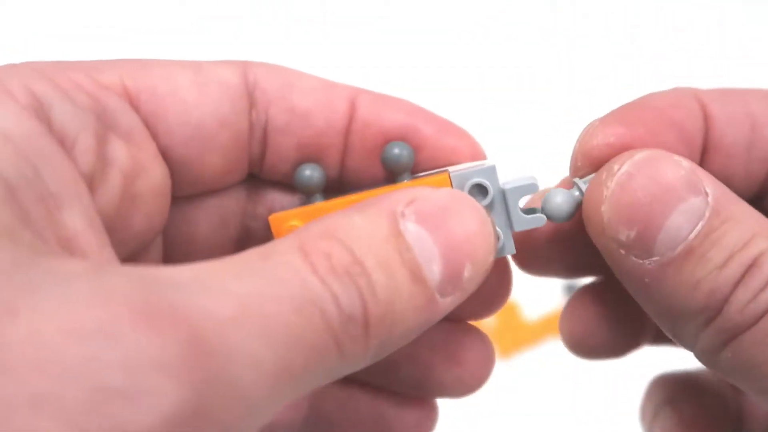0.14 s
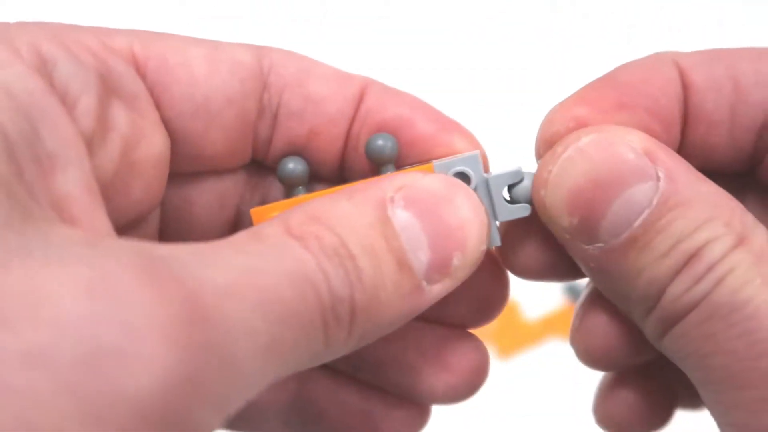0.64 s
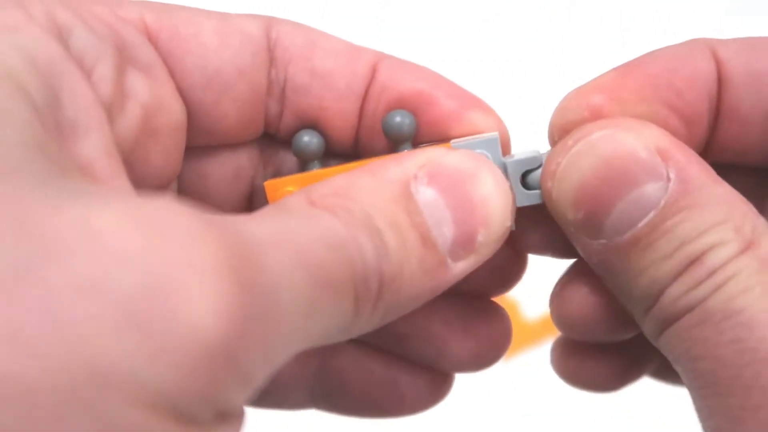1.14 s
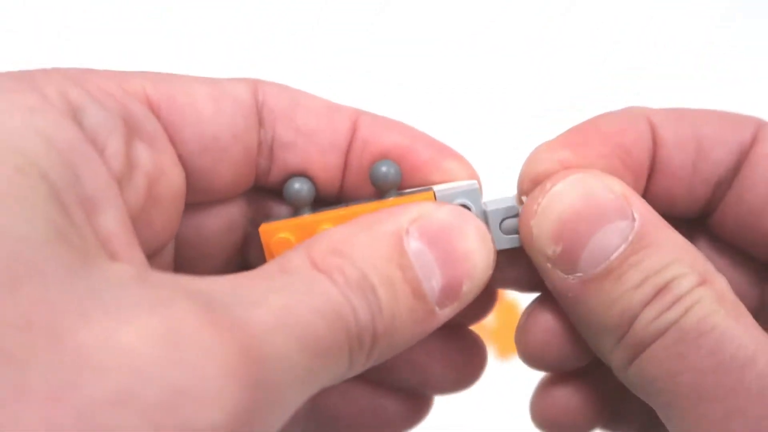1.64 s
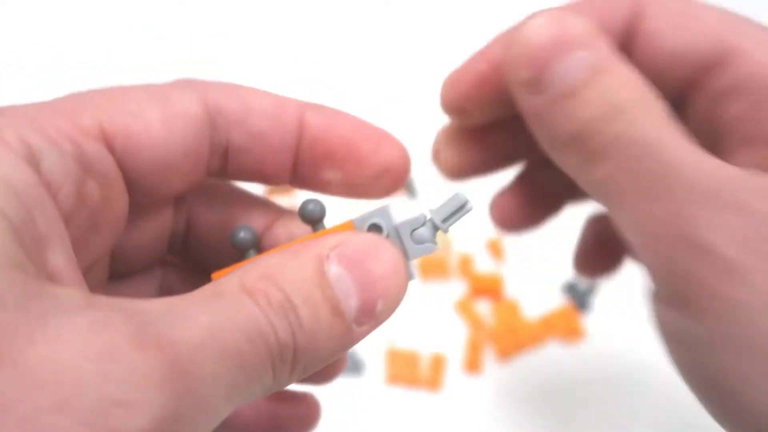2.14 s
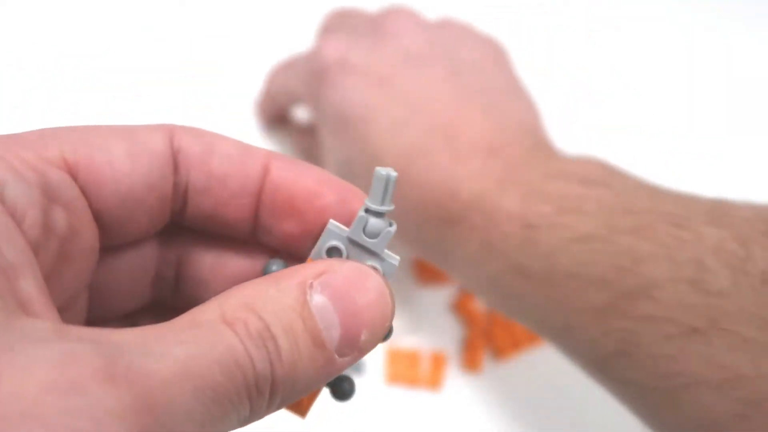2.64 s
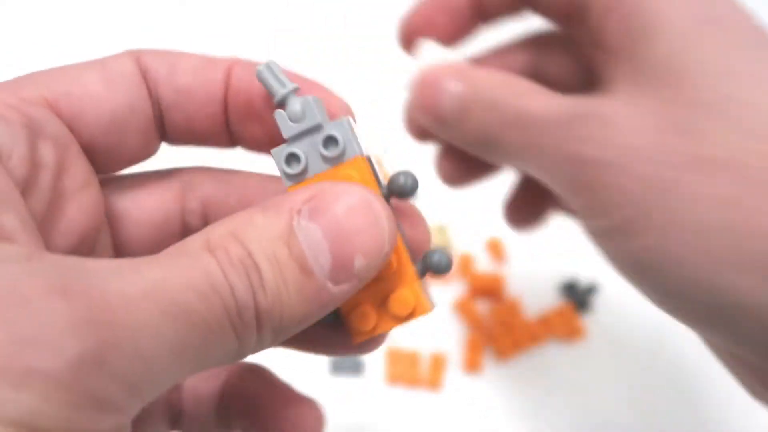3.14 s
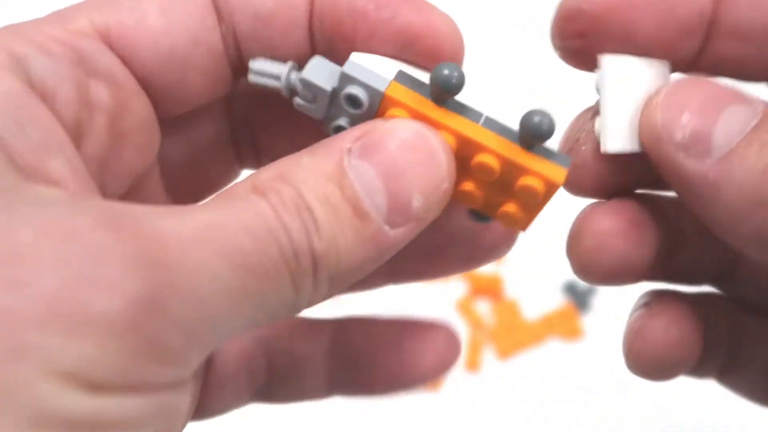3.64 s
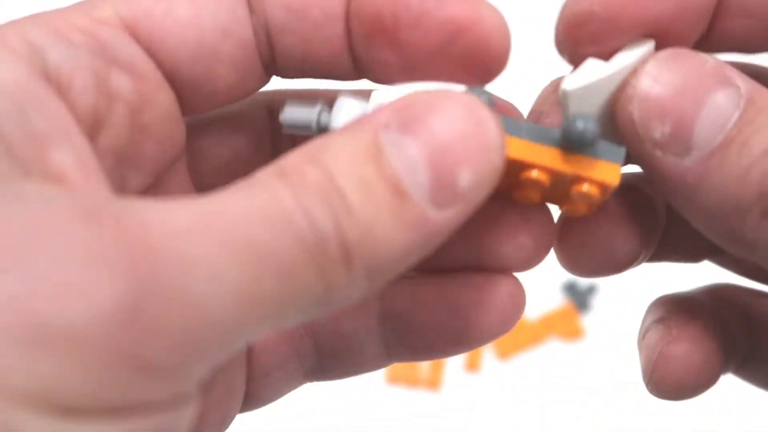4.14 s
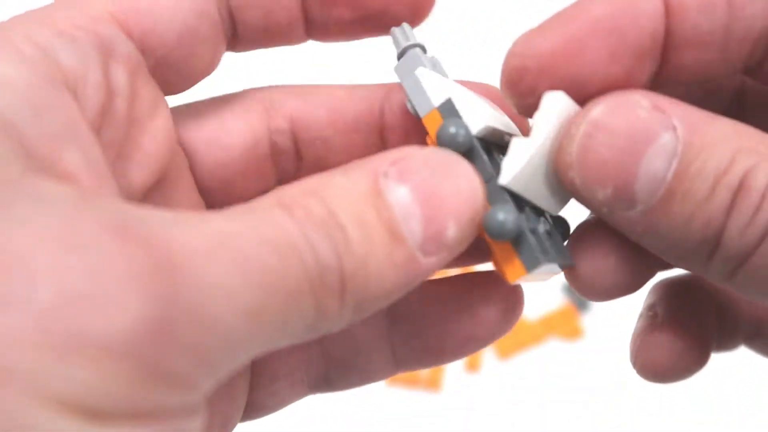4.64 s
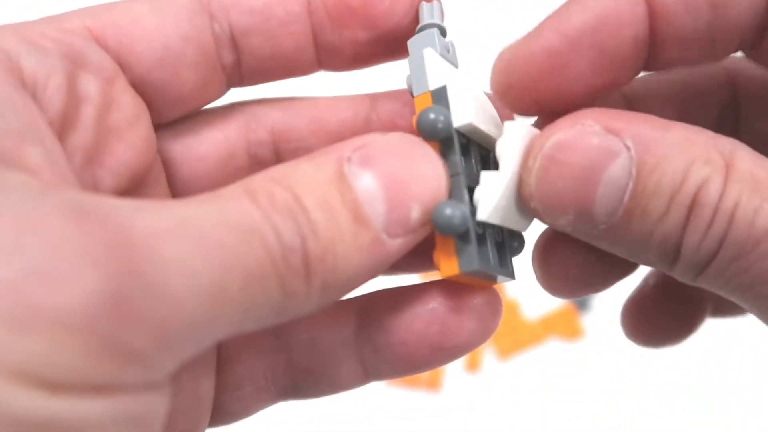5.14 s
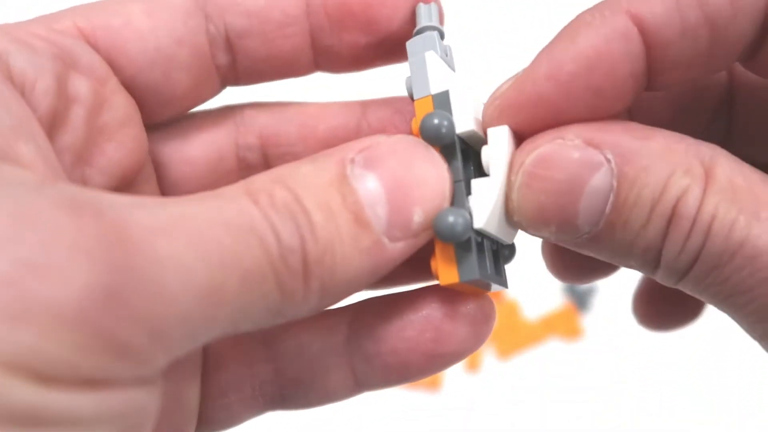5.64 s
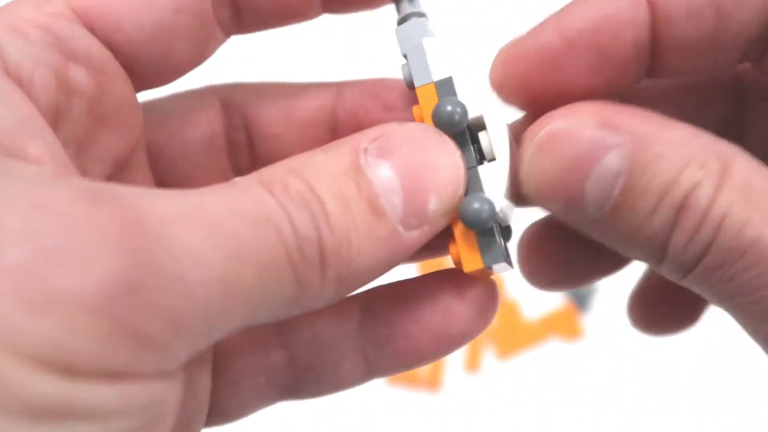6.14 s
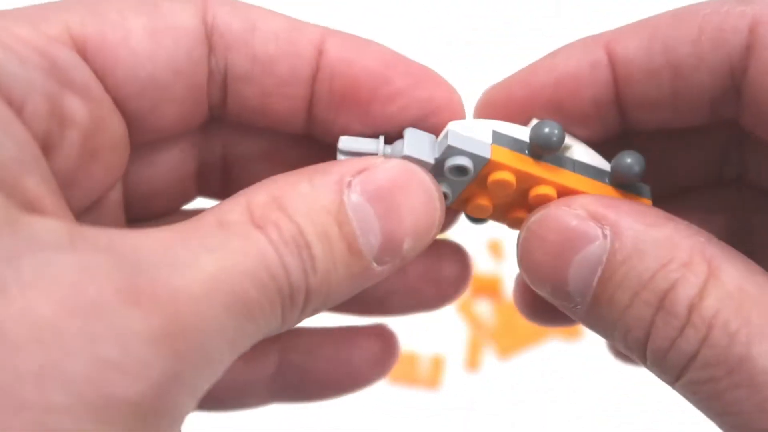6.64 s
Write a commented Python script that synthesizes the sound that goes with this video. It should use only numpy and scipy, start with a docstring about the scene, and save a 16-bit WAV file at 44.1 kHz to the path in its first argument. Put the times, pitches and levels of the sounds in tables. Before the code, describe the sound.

In a hushed small room, a tiny plastic joint snaps hard, a hand bumps the table, a loose brick clicks, and another piece seats lightly.

```python
"""Toy bricks joined by hand

Small plastic bricks above a table, close to a camera in a small quiet room. A ball joint snaps into its socket;
a hand knocks the table, nudges and lifts a loose brick, which later seats on its studs; light ticks between.
Contacts are impulses through resonances, plus a noise burst for the snap and decaying sines for the ticks.
Under it: microphone hiss, room rumble, the camera's faint whine and motor; gain ducks after the loud snap."""
import sys
import numpy as np
from scipy import signal
from scipy.fft import rfft, irfft, next_fast_len
from scipy.io import wavfile
from scipy.ndimage import uniform_filter1d, map_coordinates

SR = 44100
rng = np.random.default_rng(int(sys.argv[2]) if len(sys.argv) > 2 else 0)


def unload_wav(signal):
    """Save mono or channel-first audio to the path in sys.argv[1] as 16-bit WAV at rate SR, clipped to [-1, 1]."""
    wavfile.write(
        sys.argv[1],
        SR,
        np.round(np.clip(np.atleast_2d(signal).T, -1, 1) * 32767).astype(np.int16),
    )


def magnitude_from_level(level_db):
    """Linear magnitude for a level in decibels (20 dB per decade)."""
    exponent = np.asarray(level_db, float) / 20
    return 10 ** exponent


N = 297832


def unit(x):
    """Scaled to rms 1."""
    return x / np.sqrt(np.mean(x ** 2) + 1e-20)


def along(points, hz):
    """(frequency [Hz], value) points interpolated on a log-frequency axis."""
    point_hz, value = np.transpose(points)
    return np.interp(np.log(hz + 1), np.log(point_hz + 1), value)


def filtered(x, response):
    """x times a complex response of frequency."""
    m = next_fast_len(N + SR // 2)
    return irfft(rfft(x, m) * response(np.fft.rfftfreq(m, 1 / SR)), m)[..., :N]


def narrow(hz, width_hz, channels):
    """A Gaussian band of noise, rms 1."""
    noise = rng.standard_normal((channels, N))
    return unit(filtered(noise, lambda f: np.exp(-2 * ((f - hz) / width_hz) ** 2)))


def struck(blows, modes, soft_hz, order):
    """Impulses through causal resonances; soft contact loses treble, order 2 rounds attacks and darkens valleys."""
    def force(f):
        impulses = sum(magnitude_from_level(db) * np.exp(-2j * np.pi * f * s) for s, db in blows)
        return impulses / (1 + 1j * f / soft_hz) ** order

    def body(f):
        total = 0
        for k, (center_hz, width_hz, db) in enumerate(modes):
            damping = 1j * f * width_hz
            resonance = damping / (center_hz ** 2 - f ** 2 + damping)
            total = total + (-1) ** k * magnitude_from_level(db) * resonance ** order  # alternating polarity
        return total

    return filtered(np.ones(1), lambda f: force(f) * body(f))


def placed(x, pan_db, lag_s):
    """Stereo position by left-right level difference and delay between the microphone ports."""
    def ports(f):
        left = magnitude_from_level(pan_db / 2) * np.exp(-1j * np.pi * f * lag_s)
        right = magnitude_from_level(-pan_db / 2) * np.exp(1j * np.pi * f * lag_s)
        return np.array([left, right])

    return filtered(x, ports)


# hiss and rumble spectrum, relative: (frequency [Hz], density [dB per Hz])
HISS_SPECTRUM = [(12, -33.5), (20, -2), (40, -1.5), (55, -5), (100, -6), (200, -5.5), (260, -9.5),
                 (465, -11.5), (600, -16.5), (1300, -20.5), (3000, -25.5), (6800, -33), (7800, -32),
                 (11500, -38), (12800, -43.5), (15500, -46.5), (15800, -75.5)]
# left-right likeness of the hiss: (frequency [Hz], correlation [-1..1])
HISS_LIKENESS = [(60, 1), (110, .9), (200, .64), (380, .04), (1290, -.25), (7100, -.2), (7500, 0.86),
                 (15000, 0.93)]
# narrow humps in the room rumble: (center [Hz], width [Hz], level [dB rms])
RUMBLE_HUMPS = [(40.01, 15, -75), (60.03, 9.29, -76.5), (90.33, 10, -78), (233.3, 12, -82)]


def hiss():
    """Microphone hiss and room rumble: bottom and top central, middle wide; level drifts a little."""
    def mid_side_gain(hz):
        turn = np.arccos(np.clip(along(HISS_LIKENESS, hz), -.9, 1)) / 2
        return magnitude_from_level(along(HISS_SPECTRUM, hz)) * [np.ones_like(hz), np.tan(turn)]

    mid, side = filtered(rng.standard_normal((2, N)), mid_side_gain)
    drift = map_coordinates(rng.standard_normal(40), [np.arange(N) * 5 / SR])  # 5 points per s
    humps = sum(magnitude_from_level(db) * narrow(hz, width_hz, channels=1) for hz, width_hz, db in RUMBLE_HUMPS)
    return magnitude_from_level(-65.5 + .5 * drift) * np.array([mid + side, mid - side]) / np.std(mid) + humps


# thin tones: (frequency [Hz], level [dB rms])
WHINE_TONES = [(11779, -102), (13007, -97), (14235, -106)]
# motor runs: (start [s], end [s])
MOTOR_SPELLS = [(.05, .3), (.95, 1.44), (1.92, 2.5), (2.9, 3.38), (3.9, 4.25), (4.9, 5.5), (6.45, 6.75)]
# motor noise: (center [Hz], width [Hz], level [dB])
MOTOR_BANDS = [(3299, 200, -88.5), (6520, 150, -93)]


def camera():
    """Steady electronic whine with slight phase wander, and a small motor's spells of narrow noise."""
    t = np.arange(N) / SR
    whine = np.zeros(N)
    for hz, db in WHINE_TONES:
        wander = np.cumsum(.015 * rng.standard_normal(N))
        whine += np.sqrt(2) * magnitude_from_level(db) * np.sin(2 * np.pi * hz * t + wander)
    running = sum((t > start_s) & (t < end_s) for start_s, end_s in MOTOR_SPELLS) * 1.
    running = uniform_filter1d(running, 2000)
    motor = sum(np.sqrt(2) * magnitude_from_level(db) * narrow(hz, width_hz, channels=2) for hz, width_hz, db in MOTOR_BANDS)
    return whine + running * motor


# light touches of plastic on plastic: (time [s], level [dB], pitch [Hz], crack re ring [dB])
TOUCHES = [(.147, -62, 6300, -12), (.240, -63, 6000, -9), (1.934, -64.5, 10470, -8.5),
           (1.9478, -50.5, 2550, -6), (3.882, -58, 2410, -8), (4.181, -56.5, 12000, -7),
           (4.455, -56.5, 2790, -9), (4.534, -58, 2787, -12), (5.815, -67, 6000, -10.5)]


def ticks():
    """Per touch: a short decaying mode, two weaker overtones if below 5 kHz, and a tiny broadband crack."""
    out, t = np.zeros(N), np.arange(2000) / SR
    for s, db, hz, crack_db in TOUCHES:
        t60_s = 0.014 * (3000 / hz) ** .6  # higher pieces die faster
        ring = np.sin(2 * np.pi * hz * t)
        if hz < 5000:
            ring += .34 * np.sin(2 * np.pi * 1.66 * hz * t) + 0.24 * np.sin(2 * np.pi * 2.26 * hz * t)
        ring *= magnitude_from_level(-60 * t / t60_s)
        puff = rng.standard_normal(len(t)) * magnitude_from_level(crack_db - 60 * t / 0.0047)
        attack = 1 - np.exp(-t / 0.00025)
        out[round(s * SR):][:len(t)] += magnitude_from_level(db) * (ring + puff) * attack
    return out


# decay times: (frequency [Hz], early t60 [s], late t60 [s])
ROOM_DECAY = [(150, 0.059, 0.14), (600, 0.0801, 0.27), (1200, 0.071, 0.36), (2300, 0.12, .27),
              (4500, 0.06, .17), (8050, .07, .21), (13010, 0.08, .26), (16002, 0.057, 0.15)]


def room(x, alike):
    """Table and hands answer at once and die fast; the walls ring on more quietly."""
    hz, t, z = signal.stft(rng.standard_normal((2, SR // 2)), SR, nperseg=128)
    early_s, late_s = (along([(row[0], row[k]) for row in ROOM_DECAY], hz)[:, None] for k in (1, 2))
    decay = magnitude_from_level(-60 * t / early_s) + magnitude_from_level(-13 - 60 * t / late_s)
    mid, side = signal.istft(z * decay, SR, nperseg=128)[1]
    turn = np.arccos(np.clip(alike, -1, 1)) / 2
    tail = np.array([np.cos(turn) * mid + np.sin(turn) * side, np.cos(turn) * mid - np.sin(turn) * side])
    tail *= 1 - np.exp(-np.arange(len(mid)) / SR / .002)
    return signal.fftconvolve(x[None], tail / np.linalg.norm(tail[0]), axes=1)[:, :N]


# snap blows: (time [s], level [dB])
SNAP_BLOWS = [(1.2573, 26.5), (1.2585, 12), (1.2598, 12.5)]
# socket resonances: (center [Hz], width [Hz], level [dB])
SOCKET_MODES = [(1754, 500, -17), (2640, 580, -8.5), (4268, 500, -3.5), (5155, 900, -3.5), (6520, 600, -10),
                (7693, 902, -12.5), (8640, 1000, -13), (11300, 680, -12), (13497, 1200, -12),
                (15304, 1500, -18.5)]


def snap():
    """The ball drives the socket's resonances through a hard contact."""
    return struck(SNAP_BLOWS, SOCKET_MODES, soft_hz=20000, order=1)


# thump through the fingers: (center [Hz], width [Hz], level [dB])
HAND_MODES = [(130, 150, -38), (382, 260, -12), (740, 220, -16), (1470, 510, -22)]


def hand_thump():
    """The snap's blows drive the hands' low resonances through a softer contact."""
    return struck(SNAP_BLOWS, HAND_MODES, soft_hz=6000, order=2)


# splintery burst, relative: (frequency [Hz], density [dB per Hz])
CRACK_SPECTRUM = [(300, -33.5), (1500, -8.5), (3500, -0.5), (10000, -0.5), (16000, -3.5)]


def crack(level_db, t60_s):
    """A decaying noise burst at each blow of the snap, different at each port."""
    t = np.arange(N) / SR
    burst = sum((t >= s) * magnitude_from_level(db - 60 * np.abs(t - s) / t60_s) for s, db in SNAP_BLOWS)
    noise = filtered(rng.standard_normal((2, N)), lambda f: magnitude_from_level(along(CRACK_SPECTRUM, f)))
    return magnitude_from_level(level_db) * burst * unit(noise)


# hand on table: (time [s], level [dB])
KNOCK_BLOWS = [(2.6300, 6), (2.6430, -2.5)]
# table resonances: (center [Hz], width [Hz], level [dB])
TABLE_MODES = [(115, 84, -1), (262, 140, -25), (466, 46, -5.5), (694, 200, -24), (950, 150, -7),
               (1813, 270, -23), (2500, 620, -21)]


def knock():
    """A soft hand drives the table's low resonances."""
    return struck(KNOCK_BLOWS, TABLE_MODES, soft_hz=1790, order=2)


# nudge, then lift: (time [s], level [dB], upper minus lower modes [dB])
PICK_TOUCHES = [(2.6981, -5, -11), (2.7136, 2, 12)]
# loose brick resonances: (center [Hz], width [Hz], level [dB])
LOOSE_MODES = [(930, 120, -17), (2180, 220, -18), (2520, 120, -4.5), (3180, 136, 0.5), (3430, 227, -1),
               (4320, 720, -34), (5500, 3400, -38.5)]


def loose_brick():
    """A faint swelling lead-in, then two touches that each rebound; the grip tilts the modes about 3.25 kHz."""
    def grip(tilt_db):
        return [(hz, width_hz, db + (tilt_db if hz > 3250 else -tilt_db) / 2) for hz, width_hz, db in LOOSE_MODES]

    lead_s, last_lead_db, swell_db = .02, -14, 15
    rebound_s, rebound_db = .003, -2
    early = (np.arange(5) + rng.uniform(0, 1, size=5)) / 5  # fraction of the lead-in before the nudge
    lead_in = [(PICK_TOUCHES[0][0] - lead_s * u, last_lead_db - swell_db * u) for u in early]
    out = struck(lead_in, grip(0), soft_hz=9000, order=2)
    for s, db, tilt_db in PICK_TOUCHES:
        blows = [(s, db), (s + rebound_s, db + rebound_db)]
        out = out + struck(blows, grip(tilt_db), soft_hz=9000, order=2)
    return out


# main click: (time [s], level [dB])
SEAT_BLOW = (5.2860, -8.5)
# stud resonances: (center [Hz], width [Hz], level [dB])
STUD_MODES = [(2650, 384, -1.5), (4300, 2750, -39), (5940, 540, 4), (7200, 495, 1), (9300, 3300, -31),
              (11820, 970, -7), (14200, 904, -18)]


def seating():
    """Faint first contact, the click onto the studs, a small settling."""
    s, db = SEAT_BLOW
    blows = [(s - .0025, db - 25), (s, db), (s + 0.0045, db - 27)]
    return struck(blows, STUD_MODES, soft_hz=30000, order=2)


def scene():
    """Each contact direct, placed by level and delay, plus its share of room; crack, hiss and camera added."""
    # (sound, left minus right [dB], left lag [s], room [dB])
    sounds = [(ticks(), -.3, 1e-5, -8),
              (snap(), -.8, 1.5e-5, -15),
              (hand_thump(), 3.5, 1.5e-4, -11),
              (knock(), 1.5, 1e-5, -7),
              (loose_brick(), -.5, 1e-5, -12),
              (seating(), -.5, 1.5e-5, -15)]
    near = 0
    for x, pan_db, lag_s, room_db in sounds:
        near = near + placed(x, pan_db, lag_s) + magnitude_from_level(room_db) * room(x, alike=.7)
    burst = crack(level_db=-34.5, t60_s=.012)
    burst_room = room(burst.mean(0), alike=0.3007)
    return near + magnitude_from_level(-4) * burst + magnitude_from_level(1.5) * burst_room + hiss() + camera()


def gain_control(x, above_db, share, release_db_per_s, attack_s):
    """Loud peaks pull the gain down within milliseconds; it climbs back at a steady rate."""
    climb_db = release_db_per_s * np.arange(N) / SR
    peak_db = 20 * np.log10(np.abs(x).max(0) + 1e-9)
    cut_db = share * np.maximum(peak_db - above_db, 0)
    held_db = np.maximum(np.maximum.accumulate(cut_db + climb_db) - climb_db, 0)
    pole = np.exp(-1 / (attack_s * SR))
    return x * magnitude_from_level(-signal.lfilter([1 - pole], [1, -pole], held_db))


def low_pass(x):
    """Removes everything above the highest recorded frequency."""
    return signal.sosfilt(signal.butter(12, 16400, fs=SR, output="sos"), x)


def record(dry):
    """Gain control, then smooth clipping just under full scale."""
    x = gain_control(dry, above_db=-15.5, share=0.27, release_db_per_s=9.5, attack_s=.006)
    x = x / (1 + np.abs(x / .98) ** 6) ** (1 / 6)
    return low_pass(x)


dry = scene()
out = record(dry)
unload_wav(out)
```